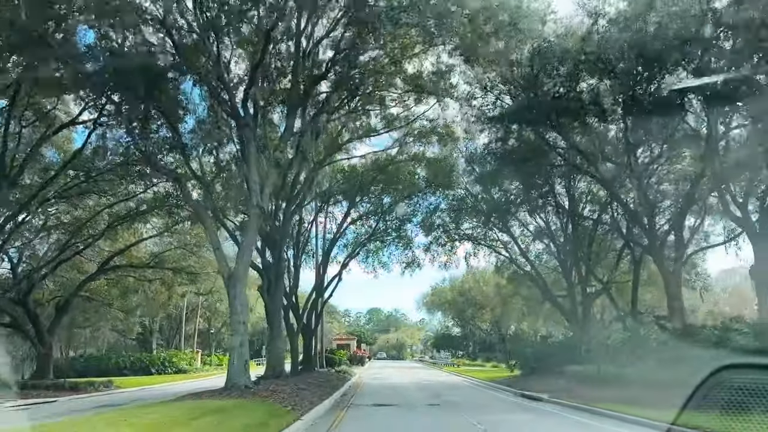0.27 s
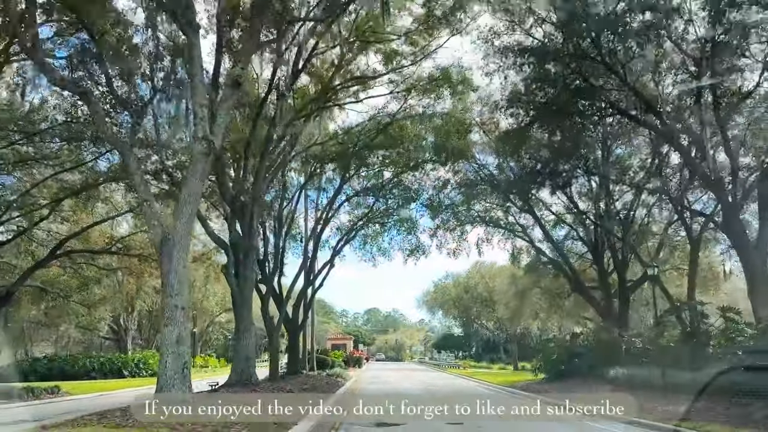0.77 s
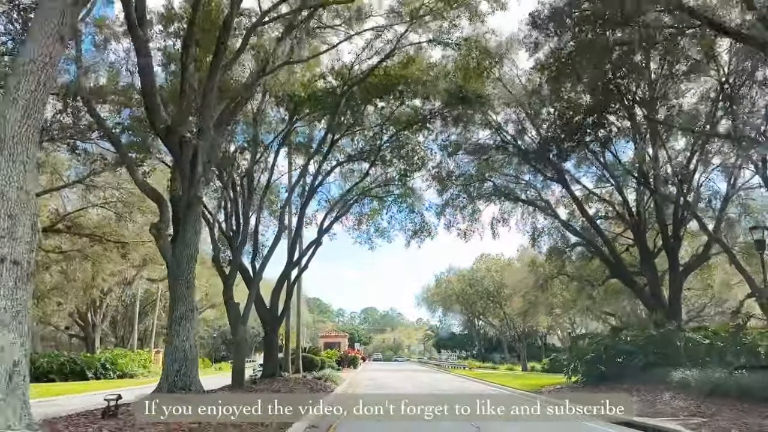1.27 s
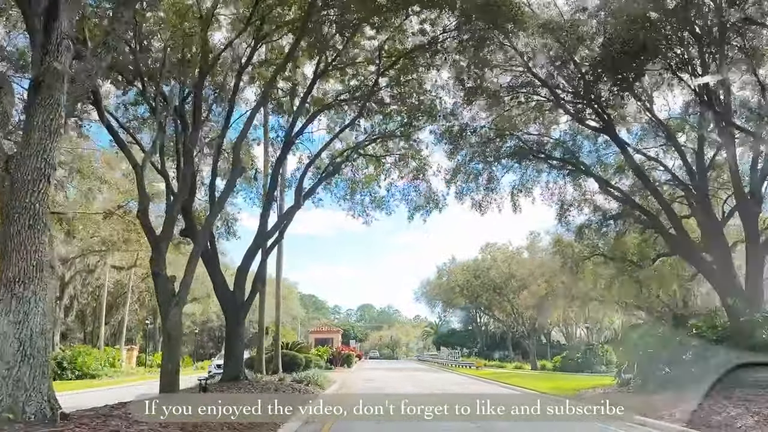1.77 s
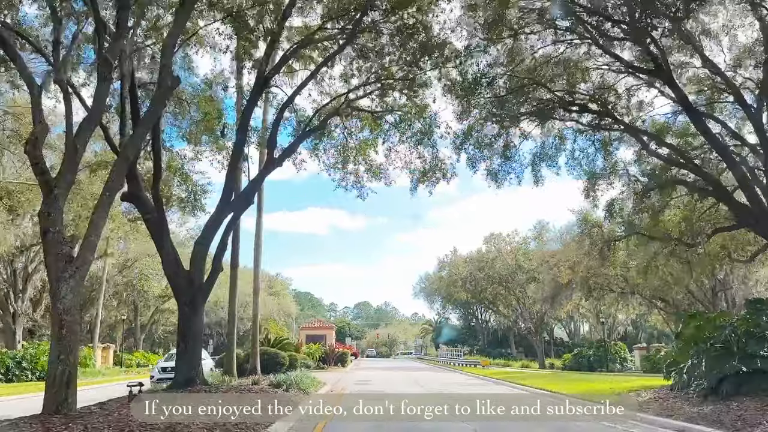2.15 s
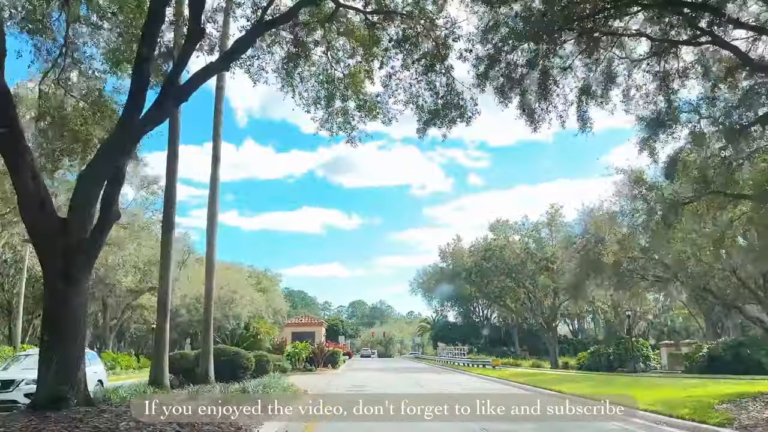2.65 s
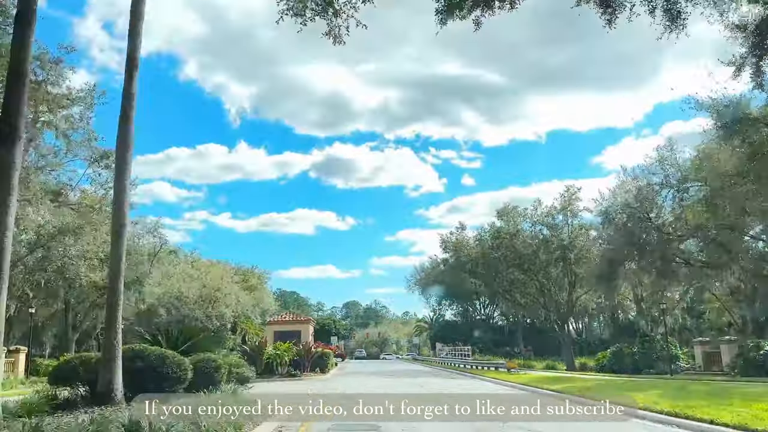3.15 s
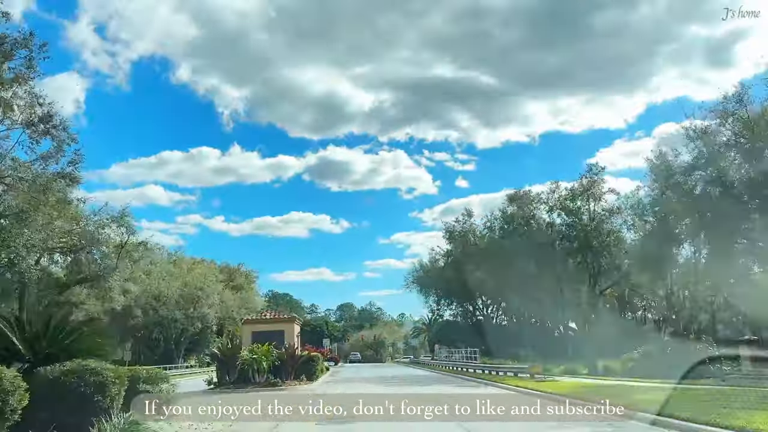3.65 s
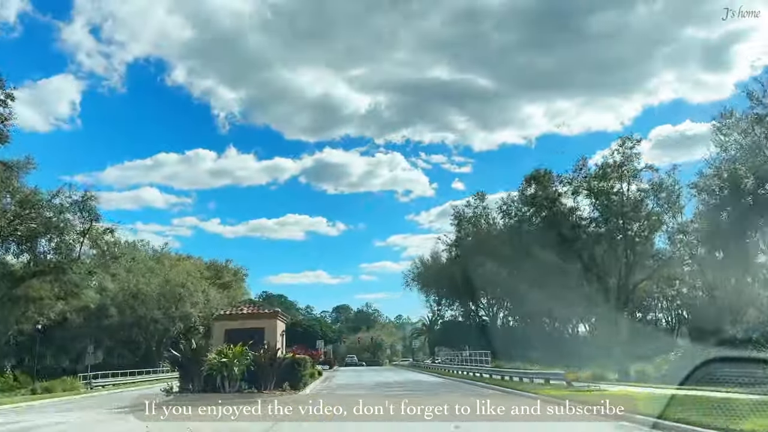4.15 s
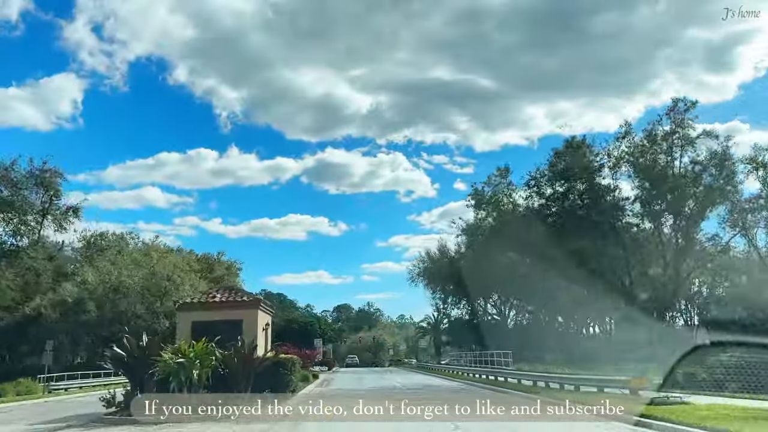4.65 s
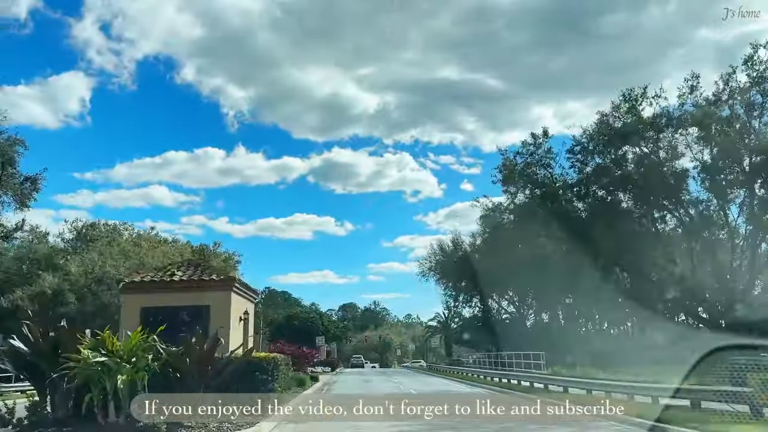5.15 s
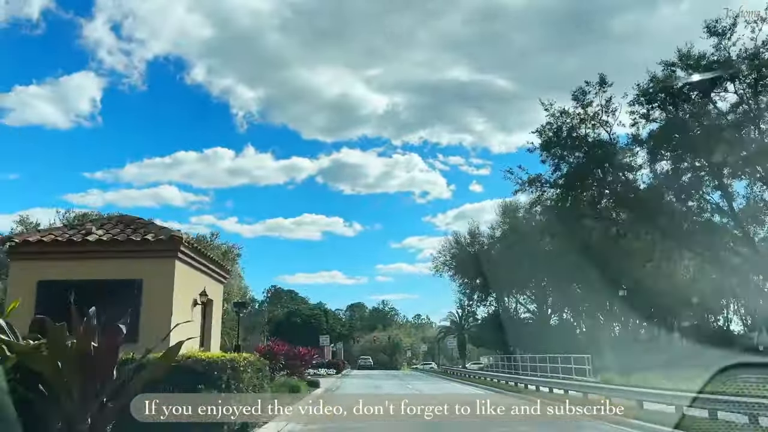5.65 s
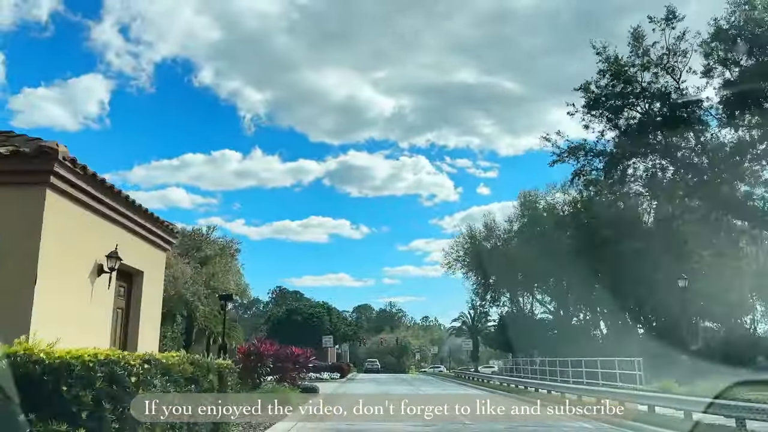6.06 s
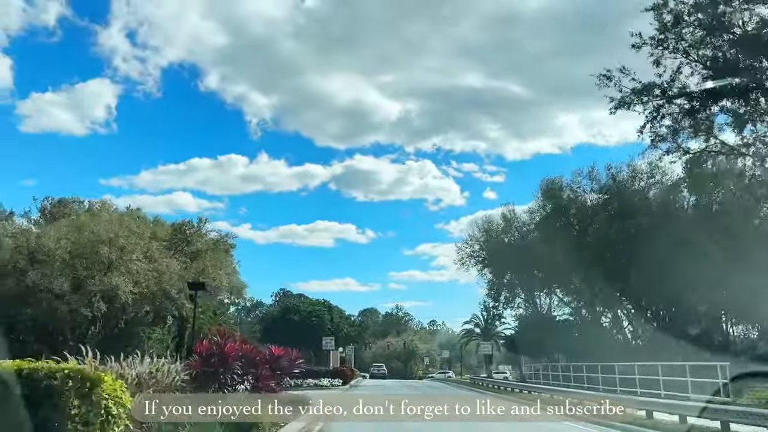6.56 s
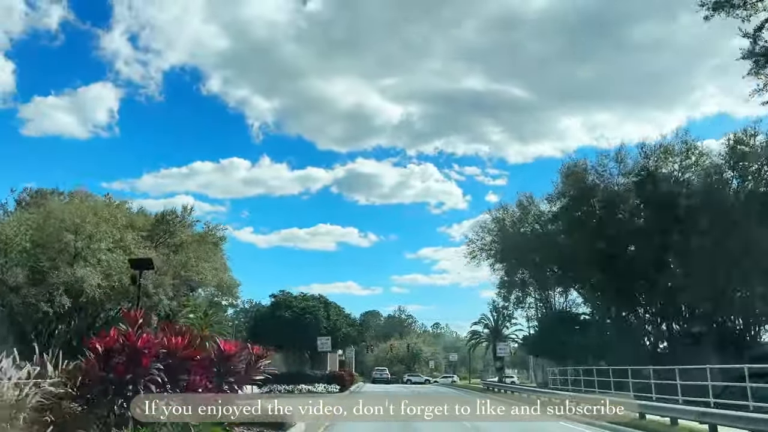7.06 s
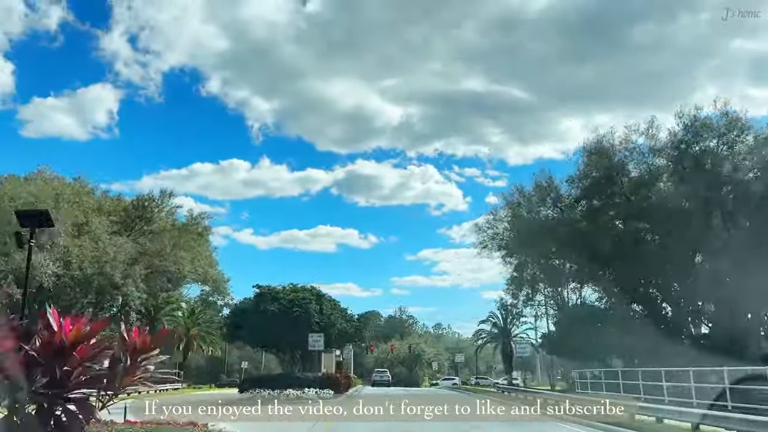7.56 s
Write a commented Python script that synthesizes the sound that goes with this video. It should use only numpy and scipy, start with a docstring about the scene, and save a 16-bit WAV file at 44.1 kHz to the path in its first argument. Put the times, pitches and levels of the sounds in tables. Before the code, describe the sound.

A muffled, bass-heavy car interior. Uneven low rumble heaves and throbs under a quieter tyre wash. Soft bumps come irregularly, one near two seconds and a bigger one just after four, followed by brittle dashboard chatter and small hollow knocks around five. Another bump and rattles come after six seconds; then the sound calms and sinks towards silence. Two microphones inside the small enclosed cabin.

```python
"""The body of a car rolling slowly along an uneven road, heard inside; all fades away towards the end. Random
noise through low modes gives heave, boom and drumming; broader noise gives tyre roar, air hiss and seal fizz.
Jolts shake the dash and swell the drumming and the boom. Loose trim chatters in short ringing bursts of noise;
dull knocks are pairs of damped tones. Two microphone ports hear the cabin."""
import sys
import numpy as np
from scipy import signal
from scipy.fft import rfft, irfft, next_fast_len
from scipy.io import wavfile
from scipy.ndimage import uniform_filter1d

SR = 44100
rng = np.random.default_rng(int(sys.argv[2]) if len(sys.argv) > 2 else 0)


def transcribe(u):
    """Save the signal u as a 16-bit wav file named by the first command-line argument.

    u: samples, shape (n,) or (channels, n), limited to [-1, 1]; the rate is SR.
    q: integer samples, one column per channel.
    """
    v = np.clip(np.atleast_2d(u).T, -1, 1)
    q = np.round(v * 32767).astype(np.int16)
    wavfile.write(sys.argv[1], SR, q)


def voltage_ratio(level):
    """Linear amplitude factor for a level in decibels (scalar or array-like)."""
    return 10 ** (np.asarray(level, float) / 20)


N = 344421  # samples

# the car slows and the sound fades: (time [s], tyre roar [dB], floor drumming [dB], door and dash drumming [dB])
ROLL = [(0, -55.5, -33, -47), (0.9, -55, -35.5, -44), (1.8, -54.5, -35, -44.5), (2.5, -55, -34, -43),
        (3.2, -53, -35.5, -45.5), (3.9, -56, -35.5, -46.5), (4.35, -56.5, -36, -46.5),
        (5.0, -61, -35.5, -47.5), (5.6, -62.5, -36.5, -49.5), (6.2, -63.5, -39.5, -50),
        (6.9, -63.5, -40.5, -57), (7.25, -67.5, -45.5, -58.5), (7.6, -73.5, -42, -58),
        (7.81, -78, -60, -70.5)]
# wheels meet a seam or a hump:
# (time [s], knock in the dash [dB], shudder of the panels [dB], throb of the cabin boom [dB])
JOLTS = [(0.86, -62, -49.5, -26.5), (1.14, -60, -42.5, -29.5), (1.579, -58, -46.5, -30.5),
         (1.96, -38.5, -35.5, -33.5), (2.27, -50.5, -42.5, -36.5), (2.429, -54, -57.5, -28),
         (3.0, -58.5, -53, -31.5), (3.89, -53, -42, -27), (4.145, -44.5, -34, -19.5),
         (4.47, -56, -47.5, -30.5), (4.742, -41, -43, -40.5), (4.945, -44.5, -40.5, -31.5),
         (5.05, -39, -54, -26), (5.83, -49.5, -50, -33.5), (5.92, -58.5, -48.5, -30.5),
         (6.29, -39.5, -37.5, -27), (6.437, -56.5, -58, -51), (6.593, -47.5, -53.5, -36.5),
         (6.808, -51, -46, -38.5), (7.537, -51.5, -57, -32)]
# treble hiss, up on rough patches: (time [s], level [dB])
HISS = [(0, -72.5), (0.63, -72.5), (1.91, -71), (2.3, -66.5), (2.78, -70), (3.22, -68), (4.1, -73.5),
        (4.17, -68.5), (4.5, -68), (4.76, -73), (5.3, -75), (5.83, -83.5), (6.26, -76), (6.31, -70),
        (6.53, -77), (6.76, -71), (6.92, -77), (7.24, -81), (7.81, -84)]
# fizz at the door seals: (time [s], level [dB])
SEALS = [(0, -90.5), (0.63, -96), (1.91, -90.5), (2.4, -81), (2.78, -87), (3.22, -81.5), (3.9, -93),
         (4.1, -88), (4.17, -82), (4.55, -81), (4.96, -90), (5.4, -87), (5.83, -99), (6.26, -92.5),
         (6.32, -81), (6.6, -86), (6.76, -85), (7.1, -96), (7.81, -99)]


def evened(x):
    """Scales to rms 1."""
    return x / np.sqrt(np.mean(x ** 2) + 1e-20)


def read(points, hz):
    """Reads a spectrum on a log-frequency axis."""
    f, value = np.transpose(points)
    return np.interp(np.log(hz + 1), np.log(f + 1), value)


def played(rows, column):
    """Gain over time from one dB column of a curve."""
    rows = np.array(rows)
    return voltage_ratio(np.interp(np.arange(N) / SR, rows[:, 0], rows[:, column]))


def modes(table, hz, steep):
    """Magnitude of resonances that add in power; steep sets how fast the skirts fall."""
    return np.sqrt(sum(voltage_ratio(2 * db) / (1 + (2 * (hz - f) / w) ** 2) ** steep for f, w, db in table))


def rings(table, hz, steep):
    """Response of struck resonances: each starts at the blow and dies away after it."""
    return sum(voltage_ratio(db) / (1 + 2j * (hz - f) / w) ** steep for f, w, db in table)


def ports(near, other, shape):
    """Colours a sound and hands it to two microphone ports: part shared, part unrelated, shifted in phase."""
    # how alike the ports are: (frequency [Hz], likeness [0..1])
    likeness = [(40, 1), (70, .98), (190, .96), (250, .76), (310, .84), (470, .3), (1000, .65), (1400, .32),
                (2150, .7), (3300, .36), (5300, .2), (7700, .55), (10000, .75), (11000, 1), (13300, 1),
                (14000, .4)]
    # phase by which left leads: (frequency [Hz], lead [rad])
    left_lead = [(40, 0), (85, .13), (170, -.05), (350, .05), (560, 2.2), (1300, 2.3), (1900, 3.8),
                 (2450, 6), (3300, 8.1), (4600, 13), (6000, 15), (8700, 14.5), (11000, 4 * np.pi),
                 (13500, 4 * np.pi), (14600, 11.3)]
    # balance of the ports: (frequency [Hz], left minus right [dB])
    balance = [(43, 0), (90, 2.3), (190, 2.4), (310, .3), (550, 4), (880, 4), (1150, 1.5), (1800, 2.8),
               (2450, -2.4), (3600, 1.2), (6000, 4.5), (7700, 3.9), (10000, 0)]
    size = next_fast_len(N)
    hz = np.fft.rfftfreq(size, 1 / SR)
    a, b = rfft(near, size), rfft(other, size)
    same = np.clip(read(likeness, hz), 0, 1)
    lean = voltage_ratio(read(balance, hz) / 2)  # half to each side
    mixed = same * a + np.sqrt(1 - same ** 2) * b
    right = mixed * np.exp(-1j * read(left_lead, hz))
    return irfft(np.array([a * lean, right / lean]) * shape(hz), size)[:, :N]


def wash(shape):
    """Steady noise of one colour, with rms 1 in the mean of the two ports."""
    pair = ports(*rng.standard_normal((2, N)), shape)
    return pair / np.sqrt(np.mean(pair.mean(0) ** 2))


def flutter(depth_db, per_s):
    """Quick random level changes from the grain of the asphalt: noise averaged twice over 1 / per_s."""
    window = int(SR / per_s)
    drift = uniform_filter1d(uniform_filter1d(rng.standard_normal(N), window), window)
    return voltage_ratio(depth_db * evened(drift))


def steadied(pair, seconds, share):
    """Takes a share of the chance swells out of a narrow rumble, leaving more of its level to the road."""
    window = int(seconds * SR)
    power = uniform_filter1d(uniform_filter1d(pair.mean(0) ** 2, window), window)
    return pair / (power + 0.004) ** (np.clip(share, 0, 1) / 2)


def shudder(column):
    """The body swells after each jolt and settles."""
    rise_s, fade_s = 0.026, 0.11
    rows = np.array(JOLTS)
    grid = np.arange(0, N, 64)
    t = np.maximum(grid / SR - rows[:, :1], 0)
    swells = voltage_ratio(rows[:, [column]]) * (1 - np.exp(-t / rise_s)) * np.exp(-t / fade_s)
    return np.interp(np.arange(N), grid, swells.sum(0))


def drumming(column, jolt_db):
    """Level of a panel: lumpy all along, swelling after each jolt."""
    lumpy = played(ROLL, column) * flutter(depth_db=1.0, per_s=14)
    return np.hypot(lumpy, voltage_ratio(jolt_db) * shudder(column=2))


def chatter(rows, column, table, steep, hold, fade, uneven_db):
    """Flurries of tiny uneven knocks, one flurry a row, ringing one set of modes; hold and fade in seconds."""
    level, t = np.zeros(N + SR), np.arange(SR // 4) / SR
    tail = np.exp(-np.maximum(t - hold, 0) / fade)
    crack = voltage_ratio(-3) * np.exp(-t / 0.004)  # extra force at the start of a flurry
    flurry = np.minimum(t / 0.001, 1) * (tail + crack)
    for row in rows:
        level[round(row[0] * SR):][:len(t)] += voltage_ratio(row[column]) * flurry
    uneven = voltage_ratio(uneven_db * np.minimum(rng.exponential(1, N), 4))
    ticks = evened(rng.standard_normal((2, N)) * uneven)
    loud = np.sqrt(np.mean(abs(rings(table, np.fft.rfftfreq(8192, 1 / SR), steep)) ** 2))
    return ports(*(ticks * level[:N]), lambda hz: rings(table, hz, steep)) / loud


def body():
    """Suspension heaves, cabin air booms; floor, doors and dash drum above them."""
    # how hard the road shakes the car: (time [s], suspension heave [dB], cabin boom [dB])
    road = [(0.0, -42.5, -29.5), (0.39, -37.5, -35), (0.95, -31, -30.5), (1.32, -38, -34),
            (1.8, -34.5, -35), (2.05, -31, -30), (2.54, -28.5, -27.5), (2.83, -33, -42), (3.39, -33.5, -32),
            (3.55, -40, -36), (4.0, -30, -36), (4.3, -32, -31), (4.7, -32, -28.5), (5.38, -29.5, -36.5),
            (5.52, -46, -37), (5.95, -34.5, -36.5), (6.39, -32.5, -37.5), (6.85, -40, -36),
            (7.3, -45, -44.5), (7.81, -41.5, -51)]
    # suspension modes: (frequency [Hz], nominal width [Hz], level [dB])
    heave_modes = [(33.6, 8.2, -19), (40.96, 35, -6), (49.5, 7, -7.5)]
    # cabin air modes: (frequency [Hz], nominal width [Hz], level [dB])
    boom_modes = [(70.2, 17, -2.5), (82.04, 15.3, 6), (100.2, 5.5, -11.5)]
    # floor modes: (frequency [Hz], nominal width [Hz], level [dB])
    floor_modes = [(124.5, 45, -0.5), (159.4, 19, 3), (184.3, 46.6, -6)]
    # door and dash modes: (frequency [Hz], nominal width [Hz], level [dB])
    panel_modes = [(280, 86.5, 0), (418.7, 170, -10), (526, 170, -12)]
    heave = wash(lambda hz: modes(heave_modes, hz, 1.93) * hz ** 4 / (hz ** 4 + 33 ** 4))
    boom = wash(lambda hz: modes(boom_modes, hz, 1.53))
    floor = wash(lambda hz: modes(floor_modes, hz, 1.455))
    panels = wash(lambda hz: modes(panel_modes, hz, 1.62))
    boom_level = np.hypot(played(road, column=2), shudder(column=3))
    low = steadied(heave, 0.11, 0.25) * played(road, column=1)
    low = low + steadied(boom, 0.072, 0.84) * boom_level
    # the floor shudders harder than the panels
    low = low + steadied(floor, 0.021, 0.2) * drumming(column=2, jolt_db=9)
    return low + panels * drumming(column=3, jolt_db=0)


def rolling():
    """Tyre roar through the cabin walls, air hiss along the glass, fizz at the door seals: shaped noise."""
    # tyre roar: (frequency [Hz], nominal width [Hz], level [dB])
    roar_modes = [(760, 167, 4.5), (1270, 110, -4), (1715, 320, -11), (2320, 680, -19), (2740, 250, -22.5)]
    # narrow tyre drone: (frequency [Hz], nominal width [Hz], level [dB])
    drone_modes = [(936, 150, 1), (1032, 140, -9.5)]
    # colour of the air hiss: (frequency [Hz], density [dB per Hz])
    air_colour = [(1180, -29), (2000, -6.5), (2610, -8), (3050, -10.5), (4510, -17), (8000, -23.5),
                  (10400, -64), (17600, -120)]
    # colour of the seal fizz: (frequency [Hz], density [dB per Hz])
    fizz_colour = [(7000, -20), (8200, 2), (10000, 3), (11200, -11), (14500, -17), (15600, -21.5)]
    roar = wash(lambda hz: modes(roar_modes, hz, 1.49)) * flutter(depth_db=1.26, per_s=13)
    drone = wash(lambda hz: modes(drone_modes, hz, 1.73))
    hiss = wash(lambda hz: voltage_ratio(read(air_colour, hz)) * (hz < 12000)) * flutter(depth_db=1.05, per_s=20)
    fizz = wash(lambda hz: voltage_ratio(read(fizz_colour, hz)) * (hz > 6000)) * flutter(depth_db=2.4, per_s=60)
    tyres = played(ROLL, column=1)
    # a narrow drone sinks less than the roar when the car slows
    low = roar * tyres + voltage_ratio(-18) * drone * tyres ** 0.76
    return low + hiss * played(HISS, column=1) + fizz * played(SEALS, column=1)


def top_fizz():
    """The highest part of the fizz rises and falls more steeply than the fizz at the seals."""
    # colour of the highest fizz: (frequency [Hz], density [dB per Hz])
    top_colour = [(10500, -30.5), (11500, 1.5), (14500, -1.5), (15600, -3)]
    # how it follows the seals: (fizz [dB], top level at that fizz [dB], slope [dB per dB of fizz])
    fizz_db, top_db, slope = (-80.5, -88.5, 1.8)
    top = wash(lambda hz: voltage_ratio(read(top_colour, hz)) * (hz > 10000)) * flutter(depth_db=2, per_s=40)
    return voltage_ratio(top_db) * top * (played(SEALS, column=1) / voltage_ratio(fizz_db)) ** slope


def rattles():
    """Loose trim: ringing plastic, a small metal clip and a dry sizzle on top; faint stray ticks besides."""
    # bursts of the trim: (time [s], plastic [dB], sizzle [dB], metal clip ring [dB])
    bursts = [(1.5834, -61.5, -101.5, -90), (2.073, -64.5, -75.5, -95), (2.2673, -64, -86, -77),
              (2.3405, -61.5, -76, -82), (2.386, -59.5, -79.5, -72.5), (2.4487, -59, -80, -70),
              (3.2943, -65, -89, -87), (3.5878, -64.5, -79, -74), (4.2334, -52, -75, -67.5),
              (4.2827, -59, -69, -76.5), (4.364, -61.5, -87, -80), (4.4602, -63.5, -74.5, -72),
              (4.5412, -51, -87, -58.5), (4.6154, -59.5, -83, -68.5), (4.6837, -64, -85, -66.5),
              (5.0583, -58.5, -84, -69), (5.1106, -56, -87.5, -69.5), (5.1218, -63, -84, -72),
              (5.1721, -63, -83.5, -70), (5.235, -64, -94.5, -75), (5.3058, -61, -81, -73),
              (5.3696, -59.5, -79, -77), (5.389, -70, -76, -85), (5.4313, -61.5, -90.5, -87),
              (6.099, -67, -91, -81), (6.2913, -60.5, -78.5, -95), (6.3274, -72, -71.5, -78),
              (6.3777, -64.5, -68.5, -80), (6.5224, -65.5, -74.5, -77), (6.592, -60.5, -79.5, -94),
              (6.6194, -67, -85.5, -70), (6.713, -57.5, -74, -73), (6.845, -64.5, -85, -84),
              (6.8963, -67.5, -91, -79), (7.561, -72, -79, -91)]
    # plastic modes: (frequency [Hz], nominal width [Hz], level [dB])
    trim_modes = [(1440, 220, 8.5), (2520, 880, -2.5), (4400, 400, -5.5), (6470, 800, -13),
                  (3370, 3000, -3.5), (5530, 2100, -14)]
    # sizzle modes: (frequency [Hz], nominal width [Hz], level [dB])
    sizzle_modes = [(8950, 2600, -2), (13000, 4000, -9)]
    # metal clip mode: (frequency [Hz], nominal width [Hz], level [dB])
    clip_modes = [(6309, 42, 0)]
    chance, size = rng.random((60, 2)).T
    when = chance * N / SR
    s, shake_db = np.transpose(HISS)
    # stray ticks follow the roughness heard in the hiss
    stray = np.transpose([when, np.interp(when, s, shake_db) - 8 + 9 * size])
    plastic = chatter(bursts, column=1, table=trim_modes, steep=2.34, hold=0.0085, fade=0.02, uneven_db=1.5)
    faint = chatter(stray, column=1, table=trim_modes[2:] + clip_modes, steep=1.9,
                    hold=0.011, fade=0.019, uneven_db=1.0)
    sizzle = chatter(bursts, column=2, table=sizzle_modes, steep=1.5, hold=0.008, fade=0.011, uneven_db=9.5)
    clip = chatter(bursts, column=3, table=clip_modes, steep=1.0, hold=0.0064, fade=0.0083, uneven_db=3.5)
    return plastic + faint + sizzle + clip


def jolts():
    """A seam or hump sends a sudden shudder through the dash: a dense flurry that rings its low modes."""
    # dash modes: (frequency [Hz], nominal width [Hz], level [dB])
    thud_modes = [(290, 240, 6), (770, 550, -5.5), (1400, 440, -15.5)]
    return chatter(JOLTS, column=1, table=thud_modes, steep=2.74, hold=0.0095, fade=0.081, uneven_db=3.0)


def knocks():
    """Short damped tones of a hollow plastic part: two close modes beat and roughen each knock."""
    # dull knocks in the dashboard: (time [s], level ahead of the port balance [dB], pitch [Hz])
    hits = [(4.206, -47.5, 1364), (4.922, -49, 1445), (5.04, -48.5, 1383), (5.389, -56, 2730),
            (6.364, -49, 1400), (6.613, -49, 864), (7.708, -55, 880)]
    out, t = np.zeros(N + SR), np.arange(SR // 10) / SR
    for s, level_db, hz in hits:
        tone = np.sin(2 * np.pi * hz * t) + 0.23 * np.sin(2 * np.pi * 1.09 * hz * t)
        decay = voltage_ratio(level_db - 60 * t / 0.049)  # 60 dB down in 49 ms
        out[round(s * SR):][:len(t)] += decay * np.minimum(t / 0.0017, 1) * tone
    return voltage_ratio([[2.5], [-0.6]]) * out[:N]  # nearer the left port


def scene():
    """All sources in the cabin."""
    return body() + rolling() + top_fizz() + rattles() + jolts() + knocks()


def band_limit(x):
    """A steep low-pass at the top of the band."""
    return signal.sosfilt(signal.butter(12, 15710, fs=SR, output="sos"), x)


def record(dry):
    """Takes the finished mix of the two ports as it stands."""
    return band_limit(dry)


dry = scene()
out = record(dry)
transcribe(out)
```